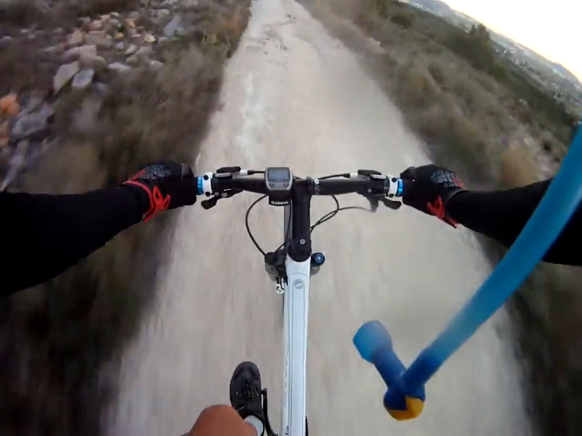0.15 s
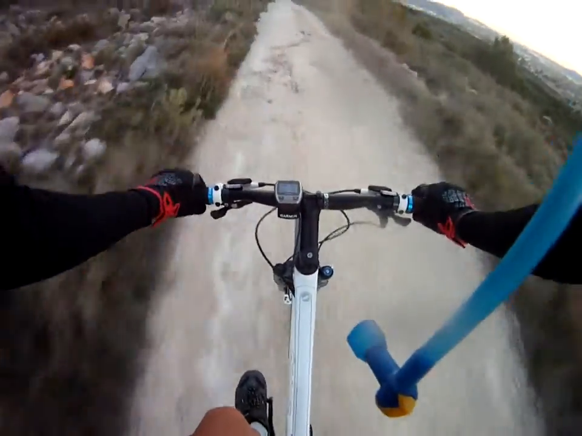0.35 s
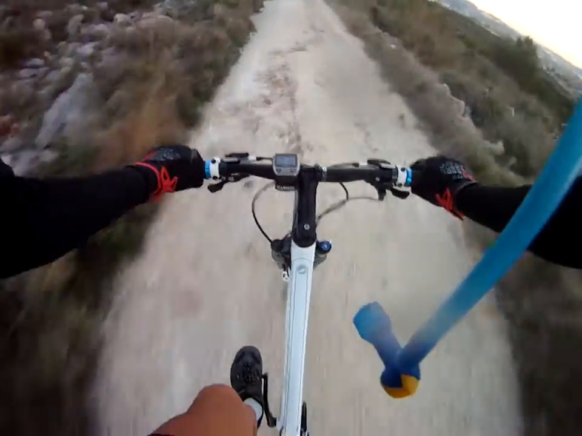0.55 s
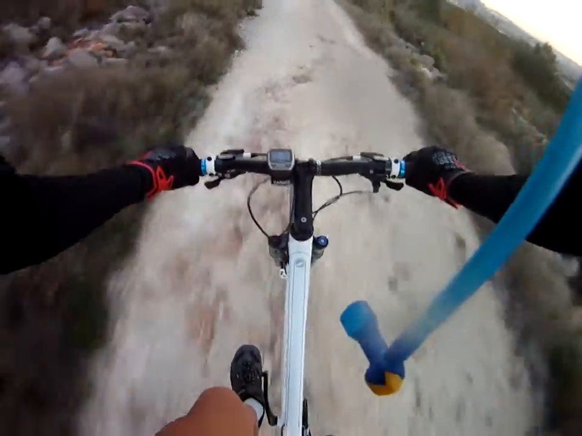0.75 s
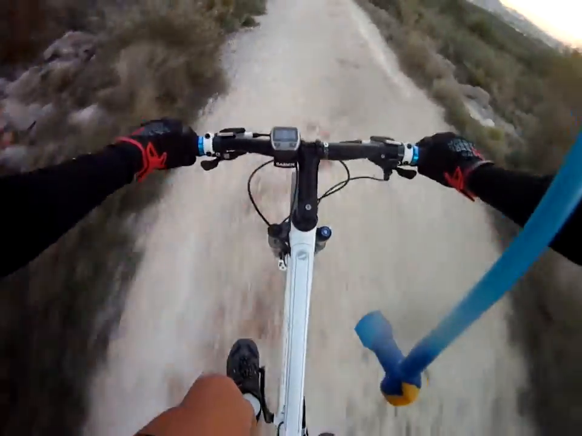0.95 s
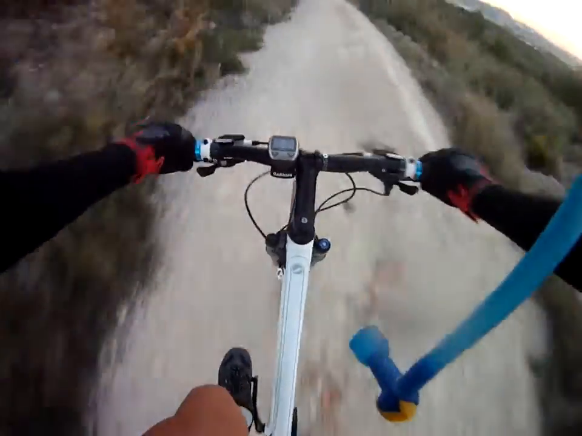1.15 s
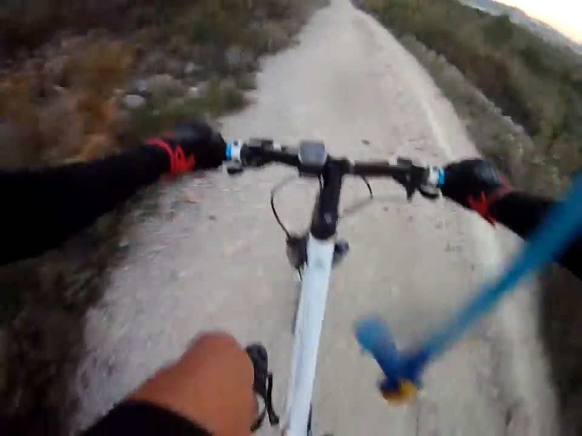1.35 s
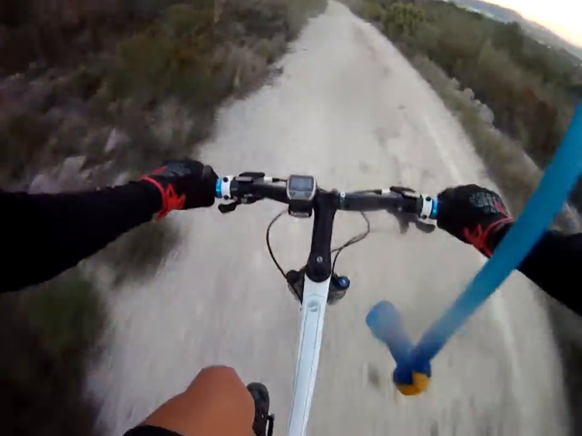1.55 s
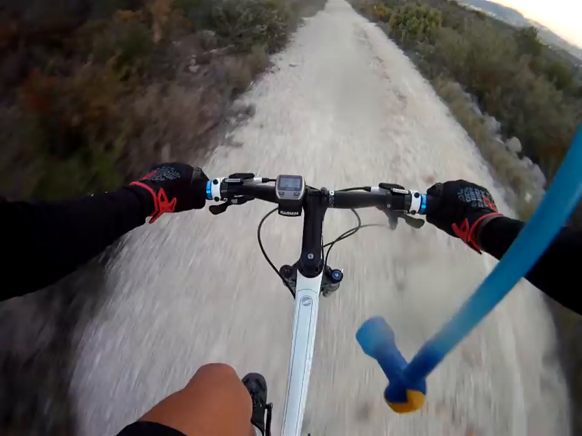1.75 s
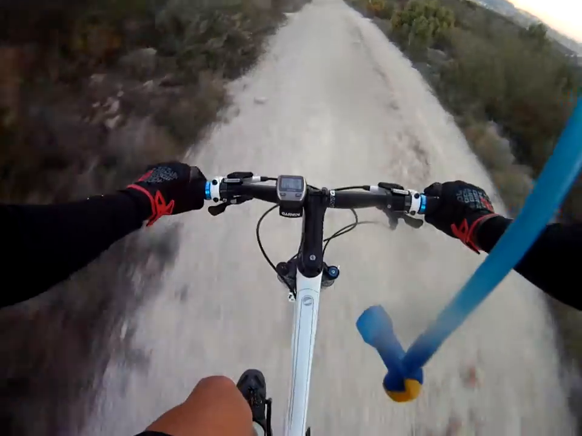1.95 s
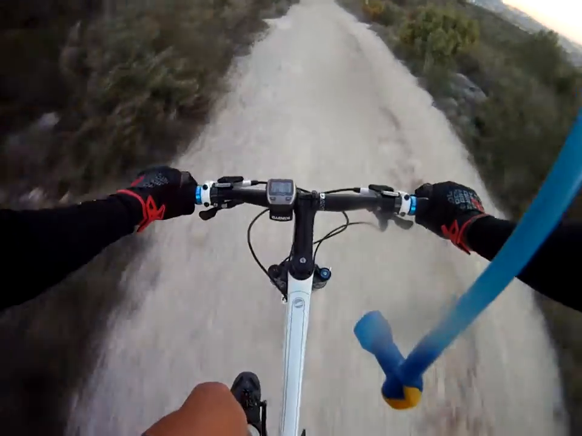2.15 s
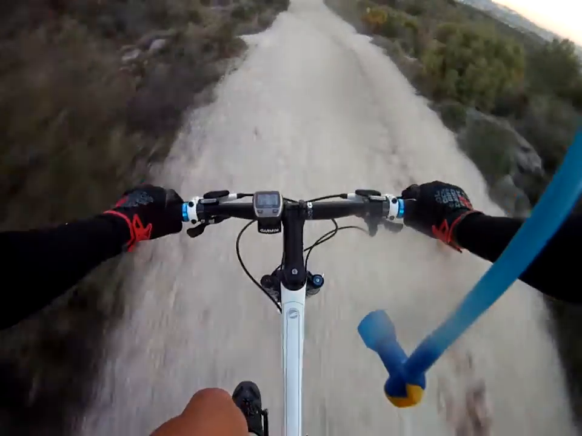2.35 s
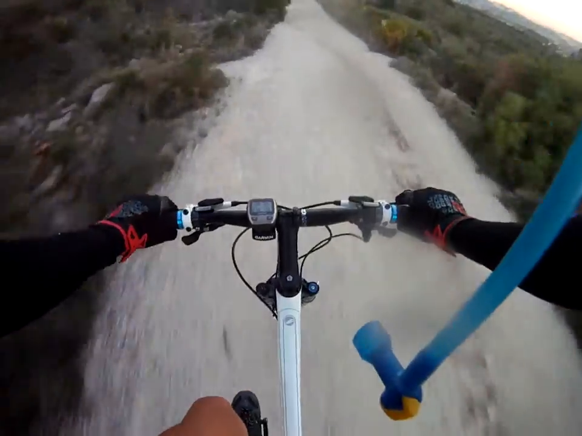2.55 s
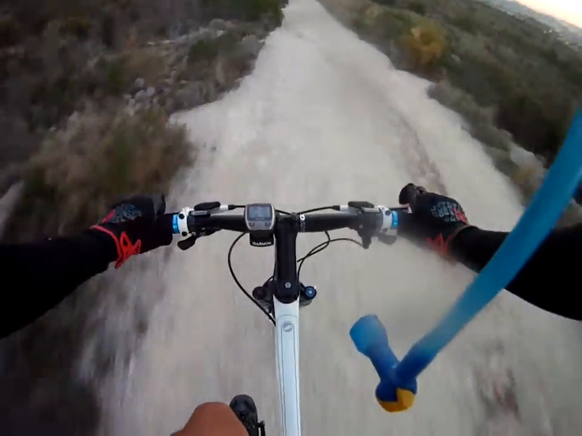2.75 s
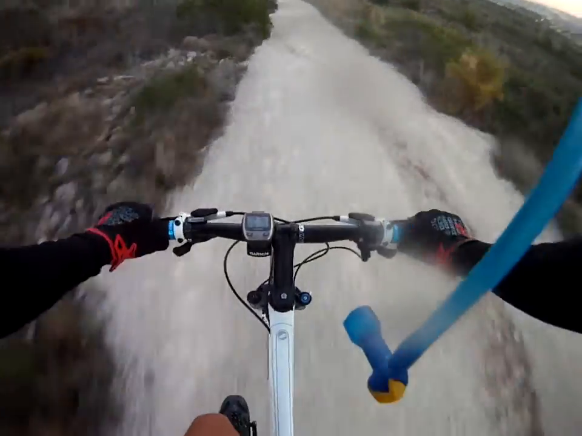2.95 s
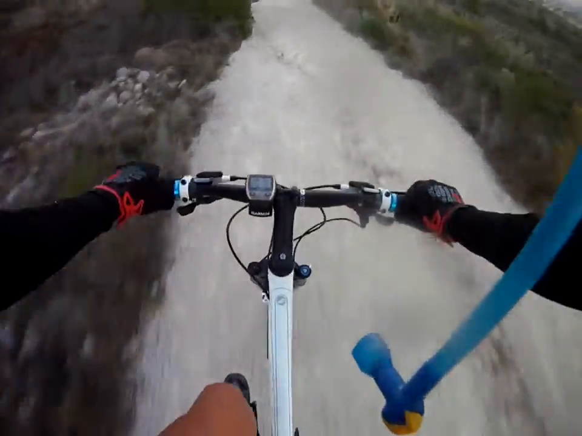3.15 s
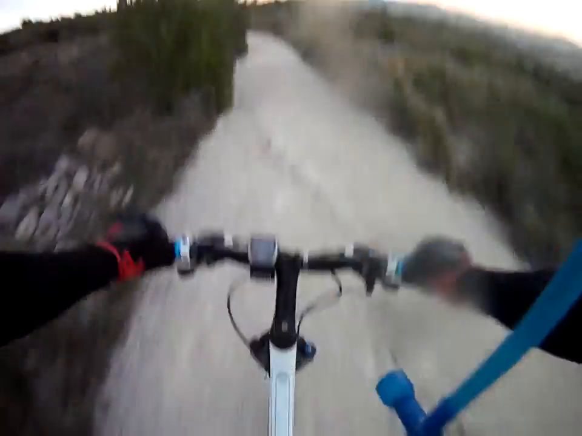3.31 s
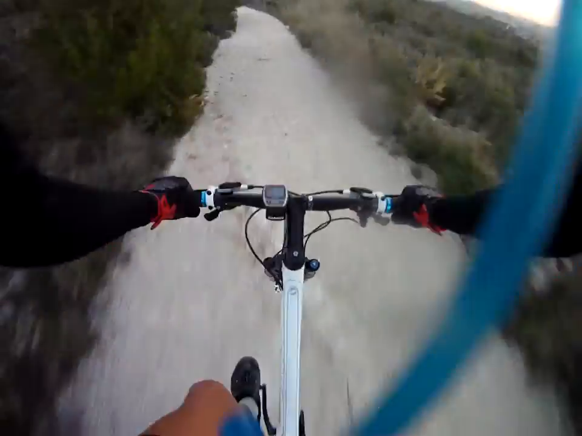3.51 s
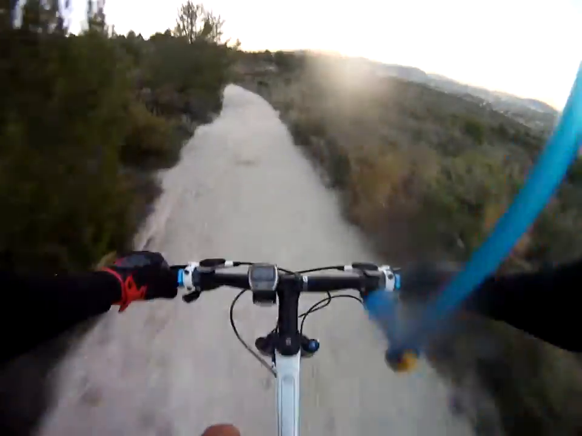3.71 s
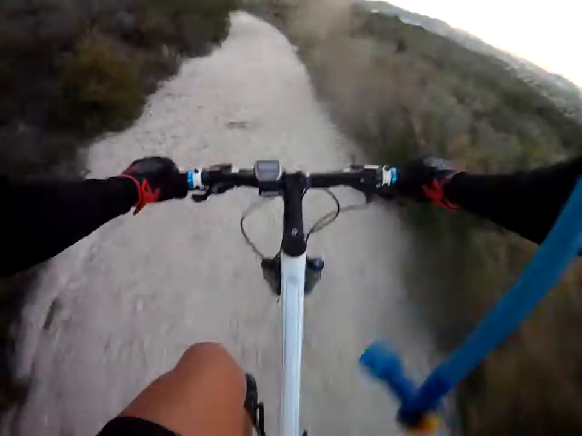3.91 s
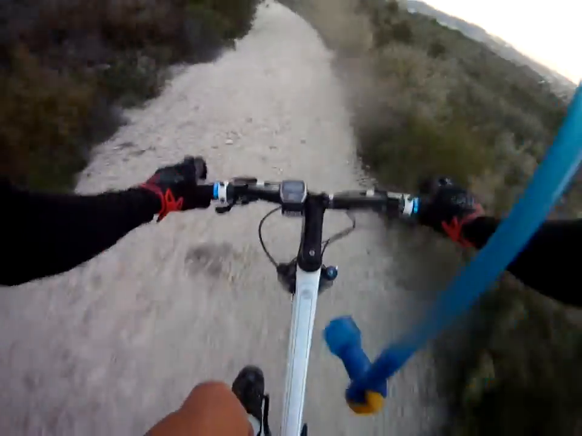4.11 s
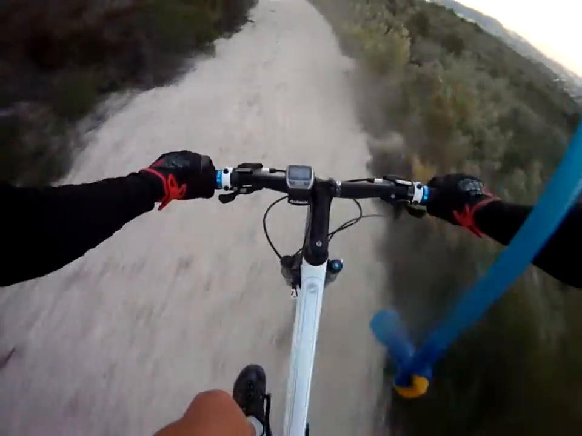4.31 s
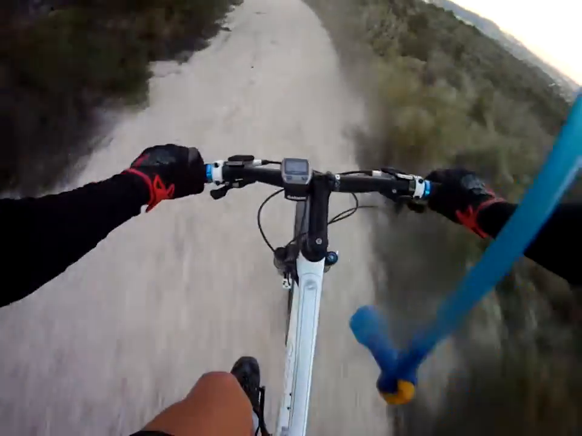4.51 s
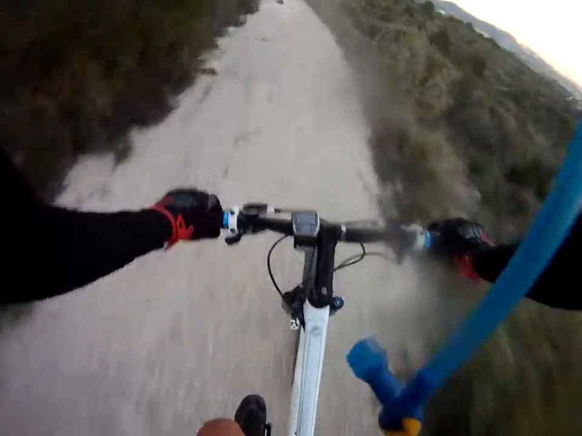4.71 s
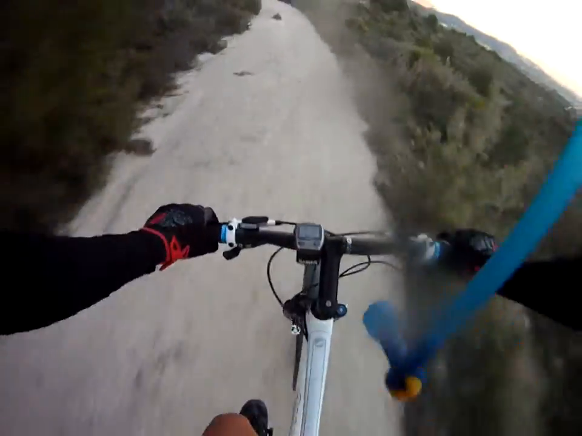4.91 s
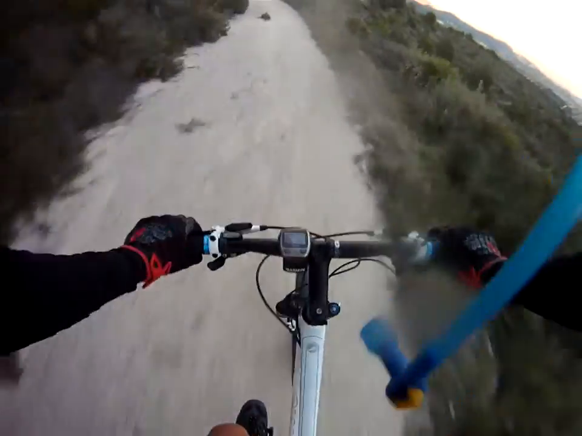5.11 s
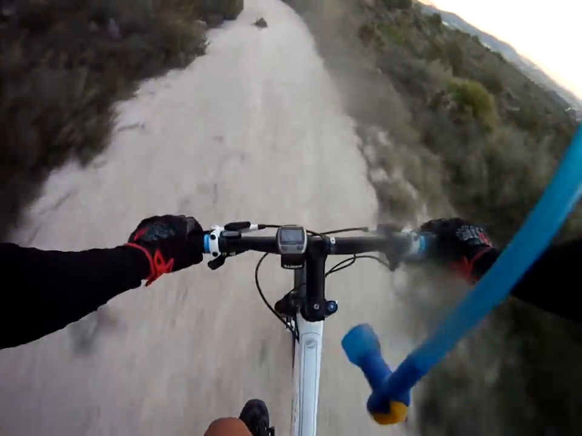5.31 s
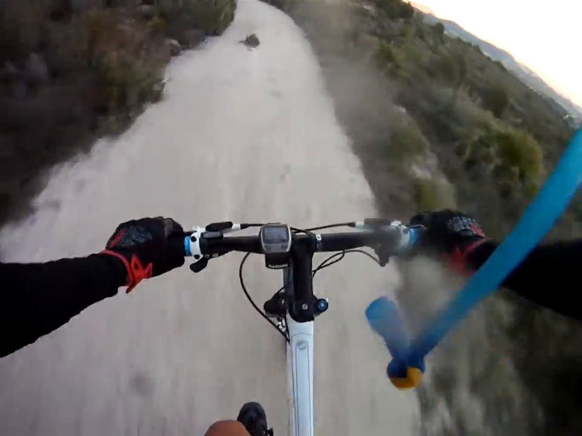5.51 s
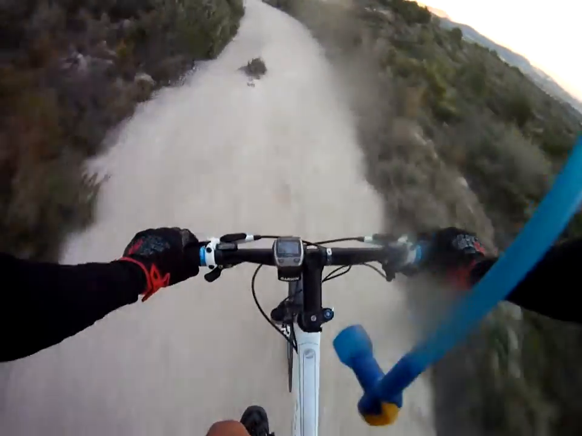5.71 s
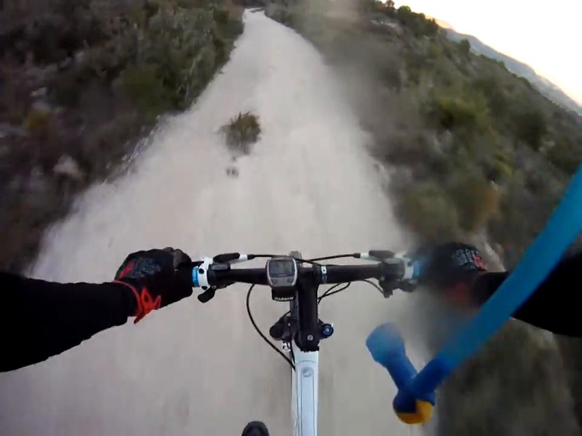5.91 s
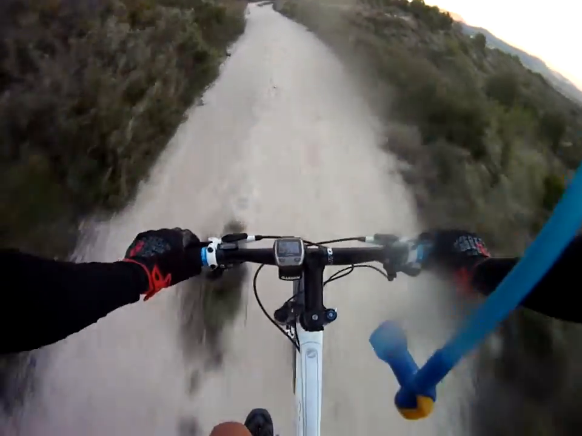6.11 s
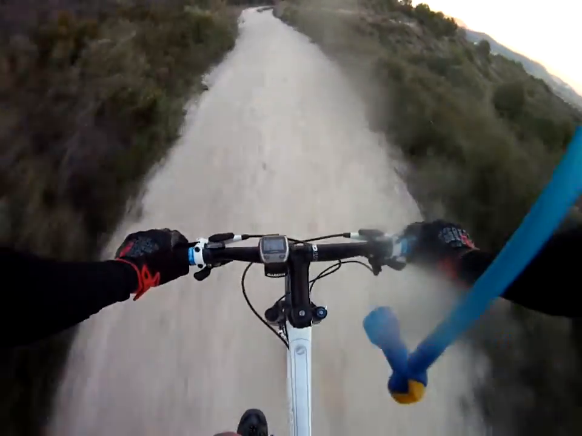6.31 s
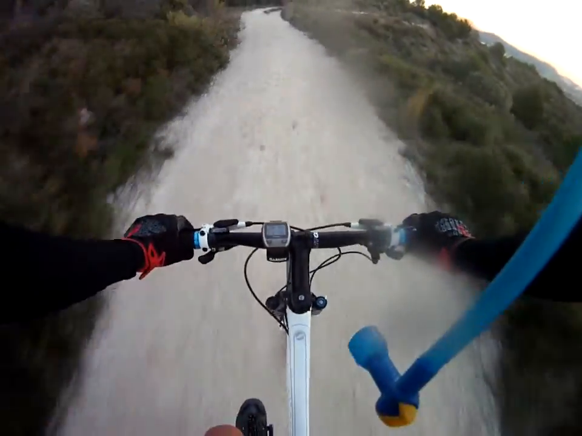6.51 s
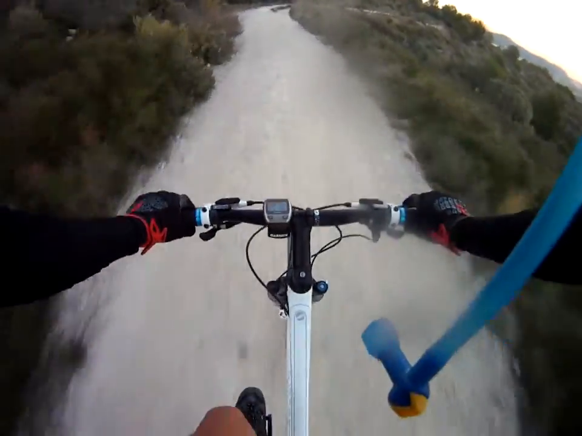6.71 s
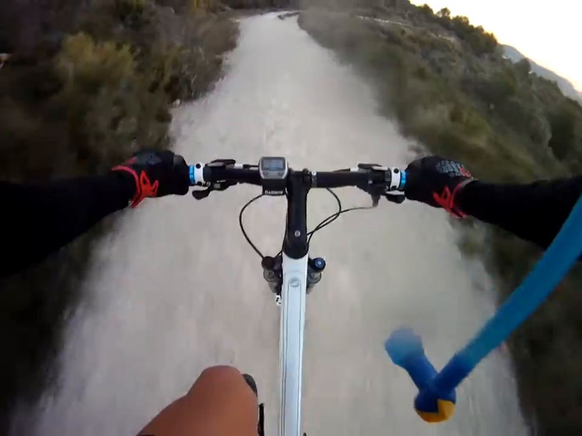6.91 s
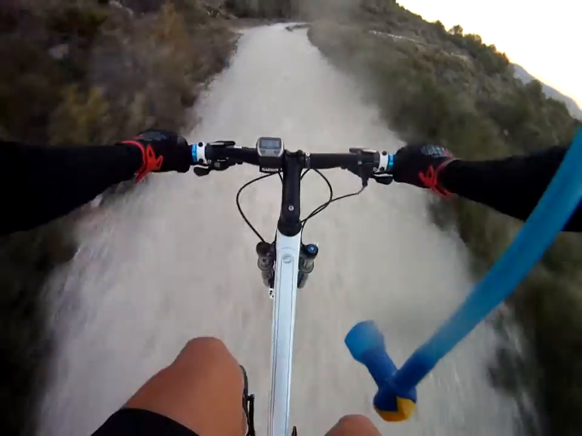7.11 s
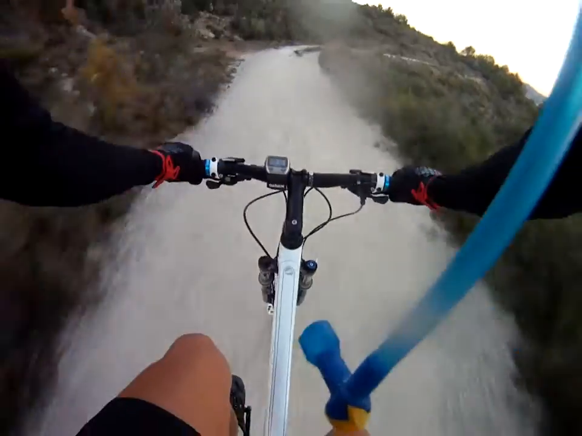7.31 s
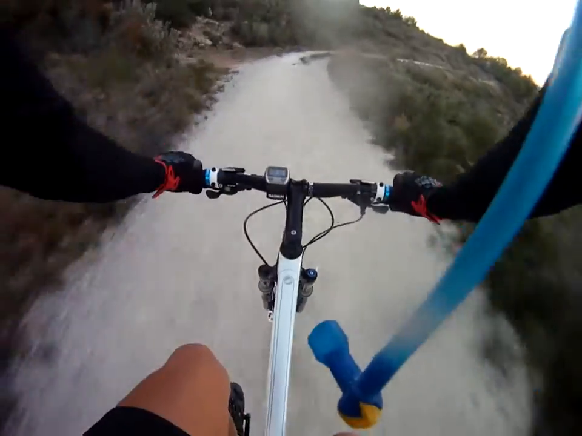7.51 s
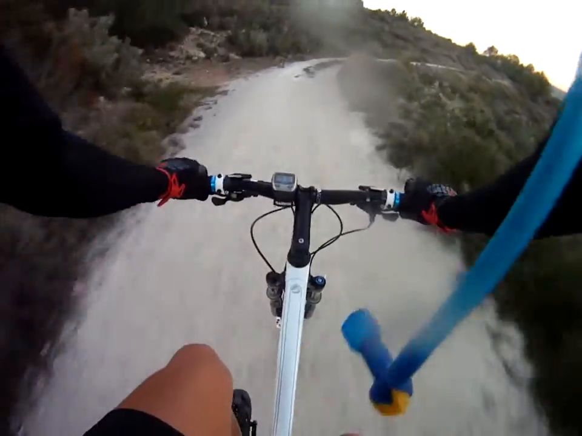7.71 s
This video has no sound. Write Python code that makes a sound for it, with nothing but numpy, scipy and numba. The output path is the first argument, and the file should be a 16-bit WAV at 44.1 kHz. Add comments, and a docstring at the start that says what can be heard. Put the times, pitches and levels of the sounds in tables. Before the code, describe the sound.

A mountain bike rolls fast down a gravel track, heard from inside a plastic case on the rider's chest. Low, fluttering wind and a fine tyre crunch with small pebble clicks run throughout. Much louder, a drink tube and straps knock and rub on the case with a hollow plastic sound. Light taps in the first second lead to a hard clatter at about 1.3 to 1.5 seconds, briefly overloading the microphone. Wind and gravel carry on with little else until 3.4 seconds, when a longer run of knocks and strap scrapes begins and the crunch grows rougher. This is loudest from 3.5 to 4 seconds and thins out by 5. Only faint taps and rubs follow over the wind and tyres, until one more hard knock lands at about 7.6 seconds.

```python
"""Mountain bike on gravel

A fast run downhill, heard from a camera in a plastic case on the rider's chest. Over the bumps a
dangling drink tube and straps knock and rub on the case; the tyres crunch through grit and pebbles,
and wind rumbles underneath. The hardest knocks overload the recorder, whose gain ducks for a moment."""
import sys
import numpy as np
from scipy import signal
from scipy.fft import rfft, irfft, next_fast_len
from scipy.io import wavfile
from scipy.ndimage import uniform_filter1d, minimum_filter1d, map_coordinates
from numba import njit

SR = 44100
rng = np.random.default_rng(int(sys.argv[2]) if len(sys.argv) > 2 else 0)


def dump(signal):
    """Clip the signal to [-1, 1] and save it as 16-bit WAV at the path in sys.argv[1]."""
    limited = np.clip(np.atleast_2d(signal).T, -1, 1)
    pcm = np.round(limited * 32767).astype(np.int16)
    wavfile.write(sys.argv[1], SR, pcm)


N = 342216
TIME = np.arange(N) / SR

# Blows on the case. Each row: start in seconds, level in dB, hardness in dB (treble against body),
# skid (strength of the chatter after the first touch).
BLOWS = [(0.2733, -21.5, 11, 0.053), (0.3492, -35.5, 4, 0.047), (0.7065, -21.5, -18, 0.059),
         (1.0024, -14, -15, 0.081), (1.0576, -20.5, 9, 0.05), (1.1041, -27, -16, .06), (1.334, 1, 0, 0.16),
         (1.3787, -3, 7, 0.09), (1.4238, -7.5, -1.5, 0.052), (1.4617, 8.5, -14, 0.051),
         (1.52, -24, -26, 0.036), (1.627, -28.5, -6.5, 0.046), (2.6017, -37, -8, 0.066),
         (3.2647, -36.5, -8, 0.073), (3.3951, -5.5, 14, 0.13), (3.434, -15, 0, 0.4),
         (3.4516, -8.5, -10, 0.074), (3.5604, 1, -8, 0.096), (3.76, 3.5, -11.5, 0.067),
         (3.7865, -7.5, -5, 0.073), (3.9056, 0.5, 4, 0.13), (3.911, -8, -4, 0.18), (3.9286, -12, -5, 0.1),
         (3.9543, -22, -18, 0.12), (3.9625, -5, -6.5, 0.14), (3.972, -18, -17, 0.11),
         (4.015, -13.5, -9.5, .06), (4.03, -20, -11, 0.049), (4.1176, -21.5, -20, 0.11),
         (4.131, -22, -19, 0.043), (4.1529, -12, -10.5, 0.067), (4.383, -14, -12.5, 0.061),
         (4.559, -22, -20, 0.037), (4.6845, -7, -11.5, 0.07), (4.8185, -9.5, -12, 0.072),
         (4.9233, -33, -9, .06), (4.9497, -16, 12, 0.033), (5.043, -32, -11, 0.055),
         (5.0506, -21, 11, 0.069), (5.538, -34.5, -22, 0.25), (5.6565, -27, -13, 0.053),
         (5.9736, -34, -10, .1), (6.0556, -22.5, -9, 0.075), (6.362, -31.5, -12, 0.058),
         (6.9218, -24.5, -6, 0.025), (7.333, -32, -7, 0.35), (7.6299, 4, -9, 0.13)]
# How the case wall colours what passes through it. Each row: frequency in Hz, gain in dB.
CASE_WALL = [(300, -14.5), (800, -7), (1350, 0), (3300, 0), (4000, -10.5), (5200, -13), (6000, -21),
             (6900, -8), (9500, -8), (10700, -15), (11400, -23), (12700, -23.5), (13400, -8), (15300, -12),
             (15800, -36.5)]


def blow(db, hardness_db, skid):
    """One blow rings the case: a hard contact excites the upper modes, a soft one the wall's main note."""
    # The case's resonances. Each row: frequency in Hz, width in Hz, level in dB.
    case_modes = [(173, 88, -7), (389, 126, -8), (720, 150, -12), (925, 90, -5.5), (1260, 110, 1),
                  (1384, 110, 0), (1680, 140, -4), (1950, 60, -10), (2240, 100, -4.5), (2780, 220, -13),
                  (3210, 160, -7), (3500, 100, -3), (4230, 150, -1.5), (4880, 400, -11), (7700, 160, -10),
                  (8500, 110, -8), (8786, 160, -6), (9720, 200, -11.5), (10300, 170, -4.5),
                  (10670, 170, -2), (13350, 190, -7.5), (14200, 260, -13), (15100, 260, -8)]
    # What a harder contact brings out. Each row: frequency in Hz, gain in dB per dB of hardness.
    hardness_tilt = [(500, 0.33), (950, 0), (1400, 0), (2200, 0.46), (2800, 1.09), (3400, 0.96),
                     (4300, 0.47), (8700, 0.87), (10600, -0.02), (14000, 0.3)]
    hz = np.fft.rfftfreq(2048, 1 / SR)
    centre, width, mode_db = np.transpose(case_modes)[:, :, None]
    # each blow lands on a different spot
    strength, detune = rng.standard_normal((2, len(centre), 1))
    off_centre = 2 * (hz - centre - 24 * detune) / width
    mode_power = amp(mode_db + 2.56 * strength) ** 2 / (1 + off_centre ** 2)
    # a heavy blow also shoves the whole case
    shove_db = 1.46 * np.clip(db - 0.5, 0, 7) / (1 + (hz / 750) ** 4)
    colour_db = along(CASE_WALL, hz) + (hardness_db + 2.0) * along(hardness_tilt, hz) + shove_db
    ring = minimum_phase(np.sqrt(mode_power.sum(0)) * amp(colour_db))
    # one clean touch, then a brief chatter as the contact skids
    t = np.arange(len(ring)) / SR
    skid_t60_s = 0.012
    force = skid * rng.standard_normal(len(t)) * amp(-60 * t / skid_t60_s)
    force[0] = 1
    knock = signal.fftconvolve(ring, force)[:len(t)]
    attack_rms = np.sqrt(np.mean(knock[:SR // 200] ** 2))  # first 5 ms
    return amp(db + 0.4) * knock / attack_rms


def knocks(ground_db, taps):
    """Tube and straps strike the case over the bumps, with light taps between as the tube jiggles."""
    track = np.zeros(N)
    for start, db, hardness_db, skid in BLOWS:
        add(track, start, blow(db, hardness_db, skid))
    for at, (size, hardness) in zip(rng.integers(0, N, taps), rng.uniform(-1.1, 1, (taps, 2))):
        tap_db = ground_db[at] + 8 + 4.7 * size
        add(track, at / SR, blow(tap_db, hardness_db=0.5 + 6 * hardness, skid=0.08))
    return track


def rubs(ground_db):
    """Webbing drags over the case in fine slips that catch in clumps; each stroke swells and fades."""
    # Strokes of strap and tube. Each row: start in seconds, end in seconds, level in dB.
    strokes = [(0.096, 0.285, -57), (0.737, 0.778, -41.5), (1.227, 1.354, -35), (1.401, 1.436, -26.5),
               (1.447, 1.474, -18.5), (2.327, 2.37, -48), (3.124, 3.18, -43.5), (3.332, 3.375, -36.5),
               (3.379, 3.484, -29), (3.61, 3.693, -34), (3.862, 3.902, -27.5), (3.905, 3.987, -31),
               (4.114, 4.16, -41), (4.686, 4.98, -43.5), (5.504, 5.612, -46.5), (5.96, 6.086, -45.5),
               (6.455, 6.496, -50.5), (6.718, 6.728, -43.5), (7.125, 7.223, -46.5), (7.28, 7.361, -40),
               (7.432, 7.447, -46), (7.478, 7.578, -50)]
    # shaken by the ground, the webbing never quite rests
    pressure = amp(ground_db - 18 + 6 * wobble(16))
    for start, end, db in strokes:
        phase = np.linspace(0, np.pi, max(int((end - start) * SR), 2))
        add(pressure, start, amp(db) * np.abs(np.sin(phase)) ** 0.35)
    pressure = uniform_filter1d(pressure, size=500)
    # the tube scuffs the case as it strikes
    for start, db, hardness_db, _ in BLOWS:
        scuff_db = min(db, 0) - 17.5 + 0.29 * hardness_db
        add(pressure, start - 0.003, amp(scuff_db) * np.hanning(SR // 100))
    # The tone of rubbed webbing. Each row: frequency in Hz, level in dB.
    webbing_tone = [(300, -3), (1000, 5.5), (1800, 6.5), (3200, 4), (4500, 12.5), (6000, 4.5), (7500, 3),
                    (10000, 3.5), (15000, -2.5)]
    slips = through_wall(grains(per_second=4300, spread_db=2.5), webbing_tone)
    clumps = amp(2.6 * wobble(70) + 1.4 * wobble(300))
    return clumps * pressure * slips


def tyres(ground_db):
    """Knobs crush fine grit; crunch and fizz flutter together with the load, and each on its own too."""
    # The tone of crushed grit. Each row: frequency in Hz, level in dB.
    grit_tone = [(300, -13), (700, -7), (1050, -12), (1350, 2), (1750, -0.5), (2400, 3), (3400, -6),
                 (4500, 1), (8000, -9.5), (9500, 0), (15000, -4)]
    split_hz = 3600
    load = amp(0.48 * wobble(25))
    crunch = unit(filtered(grains(per_second=3500, spread_db=1.0), lambda hz: hz < split_hz))
    fizz = unit(filtered(grains(per_second=5000, spread_db=4.5), lambda hz: hz >= split_hz))
    grit = crunch * amp(2.8 * wobble(60)) + fizz * amp(7 + 2.3 * wobble(35))
    return amp(ground_db + 0.34) * through_wall(grit * load, grit_tone)


def stone_ping(hz, cycles):
    """A stone's brief ring, 60 dB down after the given cycles; two close modes make it rough."""
    t = np.arange(SR // 25) / SR
    upper_hz = hz * rng.uniform(1.097, 1.1)
    tone = np.sin(2 * np.pi * hz * t) + 0.43 * np.sin(2 * np.pi * upper_hz * t)
    attack = 1 - np.exp(-t / 0.00023)
    return tone * attack * amp(-60 * t * hz / cycles)


def pebbles(ground_db, count):
    """Pebbles click against each other under the tyres."""
    track = np.zeros(N)
    for at, (pitch, size) in zip(rng.integers(0, N, count), rng.standard_normal((count, 2))):
        hz = np.clip(2000 * np.exp(0.3 * pitch), 1150, 3600)
        click_db = ground_db[at] + 1.7 + 4.2 * min(size, 2)
        add(track, at / SR, amp(click_db) * stone_ping(hz, cycles=32))
    return track


def flicked_stones(count):
    """Now and then a tyre flicks away a larger stone, which rings longer."""
    track = np.zeros(N)
    for at, (pitch, size) in zip(rng.integers(0, N, count), rng.standard_normal((count, 2))):
        hz = 2090 * np.exp(0.197 * pitch)
        add(track, at / SR, amp(-36.5 + 2.5 * size) * stone_ping(hz, cycles=51))
    return track


def eddies(level_db, spectrum, gust_db):
    """Eddies shed by the rider beat on the case as a fluttering rumble."""
    rumble = unit(filtered(rng.standard_normal(N), lambda hz: amp(along(spectrum, hz))))
    gusts = amp(gust_db * wobble(22))
    return amp(level_db) * unit(rumble * gusts)


def wind():
    """A deep buffet under the rush of the head wind; both swell and sink, with brief dropouts around the hard
    knocks."""
    # The tone of each layer. Each row: frequency in Hz, level in dB.
    buffet_tone = [(12, -14.5), (28, -2), (45, -3.5), (70, -7), (110, -21), (250, -46), (1000, -90)]
    rush_tone = [(25, -6.5), (55, -9), (85, 1.5), (130, -1), (200, -7), (300, -14), (450, -22.5),
                 (700, -34), (1200, -35), (4000, -63)]
    # How each layer swells and sinks. Each row: time in seconds, level in dB.
    buffet_levels = [(0.0, -50), (0.15, -37), (1.25, -39), (3.54, -35), (3.59, -43), (4.58, -33.5),
                     (4.65, -47), (4.77, -32.5), (5.21, -39.5), (5.71, -32), (6.33, -40), (6.68, -33.5),
                     (7.59, -37.5), (7.76, -37)]
    rush_levels = [(0.0, -40), (1.23, -39), (1.4, -40), (2.25, -41), (2.48, -37.5), (2.83, -39.5),
                   (3.13, -35), (3.8, -43.5), (3.98, -38.5), (4.15, -36.5), (5.27, -37), (5.42, -37.5),
                   (7.43, -40.5), (7.76, -39.5)]
    buffet = eddies(curve(buffet_levels) + 1.24, buffet_tone, gust_db=1.0)
    rush = eddies(curve(rush_levels) + 3.5, rush_tone, gust_db=1.16)
    return buffet + rush


def through_wall(x, spectrum):
    """An outside sound with its own spectrum, heard inside the case, at rms 1."""
    return unit(filtered(x, lambda hz: amp(along(spectrum, hz) + along(CASE_WALL, hz))))


def grains(per_second, spread_db):
    """Tiny random impacts of unequal size, at rms 1."""
    hits = rng.random(N) < per_second / SR
    size = np.clip(rng.standard_normal(N), -2.5, 2.5)
    return unit(hits * amp(spread_db * size) * rng.choice([-1, 1], N))


def minimum_phase(magnitude):
    """The most abrupt impulse response that has this magnitude spectrum."""
    cepstrum = irfft(np.log(np.maximum(magnitude, 1e-6)))
    half = len(cepstrum) // 2
    cepstrum[1:half] *= 2
    cepstrum[half + 1:] = 0
    return irfft(np.exp(rfft(cepstrum)))


def filtered(x, gain):
    """x shaped by a gain that depends on frequency."""
    size = next_fast_len(len(x) + SR // 4)
    hz = np.fft.rfftfreq(size, 1 / SR)
    return irfft(rfft(x, size) * gain(hz), size)[:len(x)]


def amp(db):
    """Decibels to gain."""
    return 10 ** (np.asarray(db) / 20)


def unit(x):
    """x at rms 1."""
    return x / np.sqrt(np.mean(x ** 2) + 1e-20)


def along(points, hz):
    """(Hz, value) points read on a log frequency axis."""
    knots_hz, values = np.transpose(points)
    return np.interp(np.log(hz + 1), np.log(knots_hz), values)


def curve(points):
    """(seconds, value) points joined by straight lines."""
    return np.interp(TIME, *np.transpose(points))


def wobble(rate):
    """A smooth random curve, rate knots a second."""
    return map_coordinates(rng.standard_normal(int(N * rate / SR) + 4), [TIME * rate])


def add(track, start_s, sound):
    """Mix a sound into the track."""
    span = track[int(start_s * SR):][:len(sound)]
    span += sound[:len(span)]


def scene():
    """Case, gravel and wind in mono; rough ground lifts the grit, pebbles, light taps and strap creep."""
    # How hard the tyres bite, higher on rough ground. Each row: time in seconds, level in dB.
    tyre_bite = [(0.0, -49.5), (0.65, -46.5), (0.84, -50.5), (1.02, -50), (1.42, -40), (2.01, -49.5),
                 (3.41, -46), (3.52, -35), (3.57, -45), (3.69, -41.5), (4.02, -40), (4.3, -44.5),
                 (4.84, -44), (5.06, -46.5), (6.59, -51.5), (7.2, -47), (7.54, -51), (7.76, -45)]
    ground_db = curve(tyre_bite)
    case = knocks(ground_db, taps=50) + rubs(ground_db)
    air = wind()
    gravel = tyres(ground_db) + pebbles(ground_db, count=900) + flicked_stones(count=16)
    return (case + gravel + air)[None]


@njit
def follow(target, attack, release):
    """The gain falls to its target at the attack rate and climbs back at the release rate."""
    gains, gain = np.empty(len(target)), 1.
    for i in range(len(target)):
        gain += (target[i] - gain) * (attack if target[i] < gain else release)
        gains[i] = gain
    return gains


def gain_control(x, threshold, hold_s, attack_s, release_s):
    """Peaks over the threshold turn the gain down, too late for their first cycles."""
    target = 1 / np.maximum(1, np.abs(x) / threshold)
    hold = max(int(hold_s * SR), 2)
    held = minimum_filter1d(target, hold, origin=(hold - 1) // 2)
    return x * follow(held, 1 / (attack_s * SR), 1 / (release_s * SR))


def record(dry):
    """The hardest knocks duck the gain and saturate at full scale; a steep low-pass trims the top."""
    ducked = gain_control(dry[0], threshold=1.8, hold_s=0.03, attack_s=0.0059, release_s=0.031)
    saturated = ducked / (1 + np.abs(ducked) ** 8) ** (1 / 8)
    top_hz = 16200
    return filtered(saturated, lambda hz: 1 / (1 + (hz / top_hz) ** 120))[None]


dry = scene()
out = record(dry)
dump(out)
```